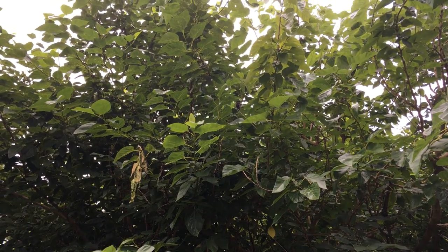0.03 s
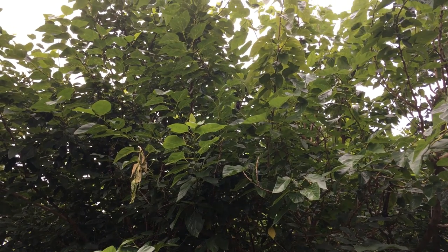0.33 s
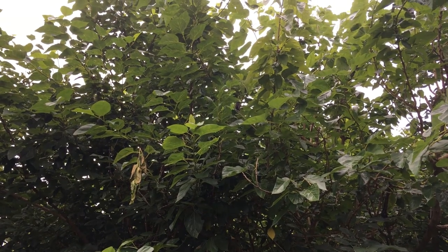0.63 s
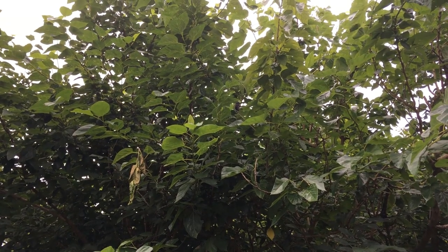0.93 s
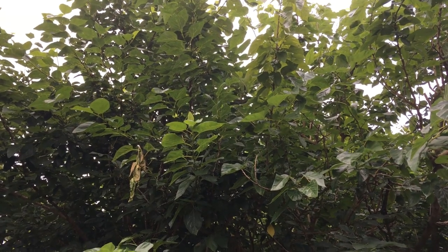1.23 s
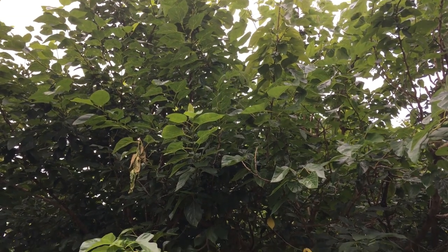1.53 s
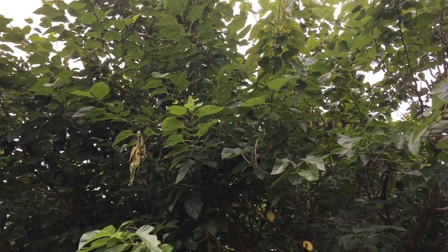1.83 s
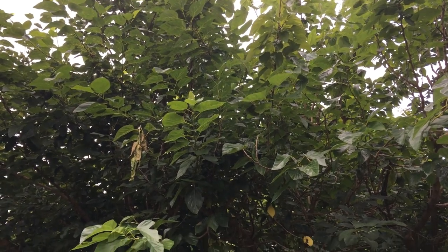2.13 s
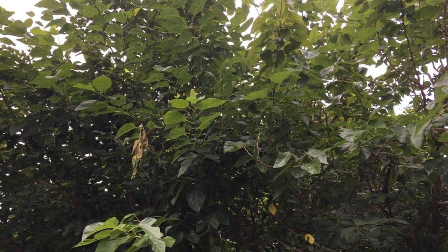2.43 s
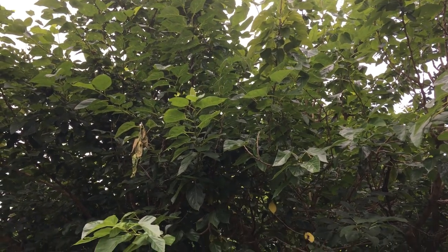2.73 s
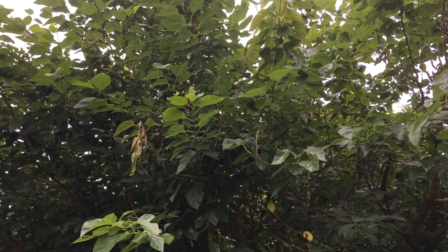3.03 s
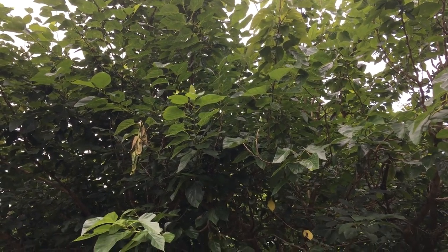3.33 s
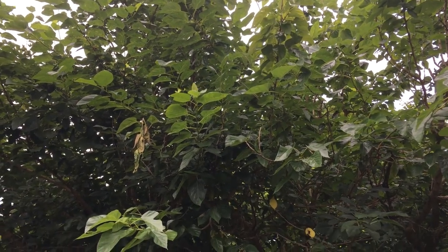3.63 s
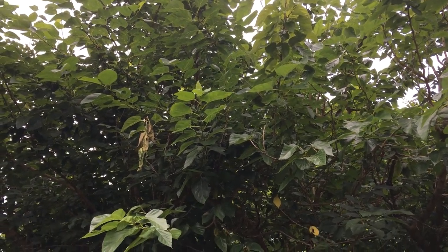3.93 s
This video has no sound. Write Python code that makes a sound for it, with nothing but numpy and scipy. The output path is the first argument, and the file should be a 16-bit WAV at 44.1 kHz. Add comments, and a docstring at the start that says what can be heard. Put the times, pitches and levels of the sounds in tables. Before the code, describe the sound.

A bird chirps steadily among the trees after a few soft knocks, a tick and a brief rumble. Each chirp sweeps up high and ends in a short buzz, ringing slightly against the quiet background.

```python
"""A bird calls eight times at an even pace in a small echoing room. Each call sweeps up into a shrill
whistle, then breaks and drops to a short nasal buzz, coloured by its throat and beak. The direct sound
is dulled, echoes scatter its highs and a thin ring lingers. Three soft knocks, a low rumble and a tick
come before the first call, one more knock later. A faint hush and a few far-off notes lie underneath."""
import sys
import numpy as np
from scipy import signal
from scipy.fft import rfft, irfft
from scipy.io import wavfile
from scipy.ndimage import uniform_filter1d

SR = 44100
rng = np.random.default_rng(int(sys.argv[2]) if len(sys.argv) > 2 else 0)


def master(y):
    """Save y as 16-bit WAV."""
    cut = np.clip(np.atleast_2d(y).T, -1, 1)
    pcm = np.round(cut * 32767)  # scale
    wavfile.write(sys.argv[1], SR, pcm.astype(np.int16))


N = 176400
JITTER = 0.021   # typical pitch wobble as a call starts, as a share of the pitch


def from_db(db):
    """Turn decibels into a number to multiply by."""
    return 10 ** (np.asarray(db) / 20)


def rms_one(x):
    """Scale a signal so that its average strength (rms) is 1."""
    return x / np.sqrt(np.mean(x ** 2) + 1e-20)


def clock():
    """The time of every sample in seconds."""
    return np.arange(N) / SR


def drift(rate_hz):
    """A smooth random wander of typical size 1; a higher rate wanders faster."""
    hz = np.fft.rfftfreq(N, 1 / SR)
    return rms_one(irfft(rfft(rng.standard_normal(N)) / (1 + (hz / rate_hz) ** 2), N))


def noise(colour):
    """Noise of strength 1, its lows and highs set by rows of f/Hz, level/dB."""
    hz, db = np.transpose(colour)
    gain = from_db(np.interp(np.log(np.fft.rfftfreq(N, 1 / SR) + 1), np.log(hz), db))
    return rms_one(irfft(rfft(rng.standard_normal(N)) * gain, N))


def dying(start_s, fade_s):
    """A level that jumps to 1, then falls by 60 dB every fade_s seconds."""
    age = clock() - start_s
    return (age >= 0) * np.exp(-np.log(1000) * np.maximum(age, 0) / fade_s)


def background():
    """A faint, wavering background hush, with one soft swell in the middle pitches."""
    # tone colour of the hush: f/Hz, level/dB
    hush_colour = [(12, -38), (20, 0), (66, 3), (87, -2), (103, -3.5), (140, -9), (238, -9.5), (478, -14),
                   (906, -15), (1160, -17.5), (1410, -17.5), (2090, -24), (15500, -28)]
    # rise and fall of the swell: t/s, level/dB
    swell_levels = [(0, -93), (3.1, -75), (3.3, -67.5), (3.5, -74.5), (4, -88)]
    # tone colour of the swell: f/Hz, level/dB
    swell_colour = [(100, -60), (500, -14), (800, -14.5), (1100, -14.5), (1600, -25), (16000, -61)]
    hush = from_db(-63.5 - 1.35 * drift(rate_hz=12)) * noise(hush_colour)
    swell = from_db(np.interp(clock(), *np.transpose(swell_levels))) * noise(swell_colour)
    return hush + swell


def far_notes():
    """Short, soft, wavering tones from far away."""
    # the peak of each note: t/s, f/Hz, level/dB
    notes = [(3.037, 770, -59), (3.285, 1070, -59), (3.31, 620, -64), (3.352, 910, -60.5)]
    t, half_length_s = clock(), 0.014
    waver = 1 + 0.0486 * drift(rate_hz=127.9)
    phase_per_hz = 2 * np.pi * np.cumsum(waver) / SR
    return sum(from_db(db) * np.exp(-((t - peak_s) / half_length_s) ** 2) * np.sin(hz * phase_per_hz)
               for peak_s, hz, db in notes)


def small_noises():
    """Dull knocks, a dry tick and a low rumble: bursts of noise that start at once and die away."""
    # the knocks: t/s, level/dB
    hits = [(0.096, -61), (0.362, -54), (.772, -47), (3.227, -52)]
    # tone colours of the three sounds: f/Hz, level/dB
    knock_colour = [(60, 2.5), (170, -7), (320, 2), (550, -12), (900, -9), (1700, -20),
                    (3000, -32), (16000, -44)]
    tick_colour = [(100, -24), (1400, -9), (2100, 4), (3200, -9), (5500, -7), (8000, -16), (16000, -13)]
    rumble_colour = [(30, -11), (70, -11), (92, 2.5), (125, -6), (220, -27), (600, -26), (16000, -70.5)]
    knocks = noise(knock_colour) * sum(from_db(db) * dying(s, fade_s=0.064) for s, db in hits)
    tick = from_db(-54) * noise(tick_colour) * dying(start_s=1.233, fade_s=0.089)
    rumble = from_db(-54) * noise(rumble_colour) * dying(start_s=1.155, fade_s=1.15)
    return knocks + tick + rumble


def room(sound):
    """A small room: the direct sound is dulled, echoes scatter its highs and a thin ring lingers."""
    # layers of blurred echoes: time to fade by 60 decibels/s, level/dB
    layers = [(0.052, -7), (0.171, -7.5), (.38, -13)]
    dull_above_hz, scatter_above_hz, ring_hz = 4630, 2380, 3120
    echoes = sum(from_db(db) * rms_one(rng.standard_normal(N) * dying(0, s)) for s, db in layers)
    keep_highs = signal.butter(2, scatter_above_hz, "high", fs=SR, output="sos")
    echoes = signal.sosfilt(keep_highs, echoes / np.sqrt(N))
    ring_fade = dying(0, fade_s=0.47)
    ring = from_db(-5.5) * 2 * ring_fade / ring_fade.sum() * np.sin(2 * np.pi * ring_hz * clock())
    direct = signal.sosfilt(signal.butter(1, dull_above_hz, fs=SR, output="sos"), sound)
    return from_db(-4) * direct + signal.fftconvolve(sound, echoes + ring)[:N]


def call_shape(t, start, snap, end, top_hz, buzz_hz, lateness, settle_s, hoarse_s, whistle_db, buzz_db):
    """How one call moves: it climbs, breaks at the time snap, settles to a buzz and slips down."""
    # the climb: share of its length, share of the top pitch, level/dB
    climb_points = [(0, .13, -40.5), (.11, 0.29, -22.5), (0.188, .48, -13.5), (0.251, .62, -7.5),
                    (.36, .735, -5.5), (0.519, .84, -0.5), (.7, .965, -2.5), (.83, 0.97, 2.5),
                    (0.918, 1, -7), (.96, .84, -4)]
    drop_hz, drop_s, sag_hz = 1297, .007, 459   # a quick drop at the break, then a slower sag
    slip_hz, slip_lead_s, slip_s = 232, 0.0097, 0.0029   # depth, time before the end, half length
    fade_lead_s, fade_db_per_s = 0.0098, 1292
    share, height, level = np.transpose(climb_points)
    share = np.append(share, 1)   # one more point joins the climb to the buzz
    progress = np.clip((t - start) / (snap - start), 0, 1) ** lateness
    after = np.maximum(t - snap, 0)
    fall = buzz_hz + drop_hz * np.exp(-after / drop_s) + sag_hz * np.exp(-after / settle_s)
    fall -= slip_hz * (1 + np.tanh((t - end + slip_lead_s) / slip_s)) / 2
    climb = np.interp(progress, share, np.append(height * top_hz, fall[0]))
    hz = uniform_filter1d(np.where(t < snap, climb, fall), size=120)
    db = np.interp(progress, share, np.append(level + whistle_db, buzz_db))
    db -= fade_db_per_s * np.maximum(t - end + fade_lead_s, 0)
    accent_db = 15.5 * np.exp(-((t - end + slip_s) / 0.0089) ** 2)   # a brief push on the slip
    # The voice clears as it climbs, turns hoarse at the break, then clears again.
    climb_jitter = JITTER * (1 - 0.76 * progress ** 2)
    buzz_jitter = 0.0022 + 0.021 * np.exp(-after / hoarse_s)
    return hz, db, accent_db, np.where(t < snap, climb_jitter, buzz_jitter)


def voice(hz, db, accent_db, wobble):
    """A stack of tones (harmonics), rich when low and nearly pure when high; hz is the second one."""
    # harmonics 1, 2, ... of the whistle: level/dB
    whistle_levels = [-37.5, 0.5, -25, -15.5, -29, -72]
    # harmonics 1, 2, ... of the buzz: level/dB
    buzz_levels = [-38, 2, 1.5, -1.5, -2, -12, -3.5, -18, -3, -9.5, -29, -10, -23, -34, -58, -30]
    # pitches that the throat and beak strengthen: f/Hz, width/Hz, lift/dB
    throat = [(3148, 60, 5.5), (3740, 300, 5.5), (5740, 1460, 0.5), (7980, 660, 3.5), (9530, 490, 1.5),
              (12700, 750, 2.5), (14810, 2360, 11)]
    buzz_below_hz, whistle_above_hz = 2060, 5080
    purity = np.clip((hz - buzz_below_hz) / (whistle_above_hz - buzz_below_hz), 0, 1)
    phase = 2 * np.pi * np.cumsum(hz / 2 * (1 + wobble)) / SR
    whistle_gains = np.pad(from_db(whistle_levels), (0, len(buzz_levels) - len(whistle_levels)))
    out = 0
    for k, (whistle, buzz) in enumerate(zip(whistle_gains, from_db(buzz_levels)), 1):
        tone_hz = k * hz / 2
        lift_db = sum(lift / (1 + (2 * (tone_hz - centre) / width) ** 2)
                      for centre, width, lift in throat)
        lift_db += accent_db * (k == 4)   # only the fourth harmonic gets the accent
        gain = (purity * whistle + (1 - purity) * buzz) * from_db(db + lift_db)
        gain *= np.clip((SR / 2 - tone_hz) / (SR / 10), 0, 1)   # fade tones too high for the sample rate
        out = out + np.sqrt(2) * gain * np.sin(k * phase + rng.uniform(0, 2 * np.pi))
    return out


def bird():
    """Eight calls; the hoarser the voice, the more its pitch and level tremble."""
    # the calls: start/s, break/s, end/s, top pitch/Hz, buzz pitch/Hz, lateness (above 1 climbs later),
    # settling time/s, hoarse time/s, whistle level/dB, buzz level/dB
    calls = [(1.463, 1.609, 1.665, 6520, 1947, 0.95, 0.068, 0.023, -32, -45),
             (1.785, 1.932, 2.013, 7356, 1970, 0.99, 0.043, 0.021, -30, -47.5),
             (2.146, 2.282, 2.374, 7703, 2030, 1.036, 0.03, 0.013, -29.5, -46),
             (2.496, 2.645, 2.723, 7800, 1990, 1.063, 0.039, 0.025, -29, -46),
             (2.842, 2.981, 3.075, 7830, 2080, .95, 0.015, 0.011, -31, -48.5),
             (3.193, 3.336, 3.427, 7935, 2020, .93, .03, 0.017, -32, -47.5),
             (3.539, 3.69, 3.787, 7925, 1990, 0.98, 0.044, 0.021, -31.5, -46.5),
             (3.899, 4.057, 4.140, 7964, 2000, 1.02, .035, .018, -30.5, -61)]
    t, out, tail_s = clock(), np.zeros(N), .03
    wobble = drift(rate_hz=380)
    shimmer = 4.5 * drift(rate_hz=380)
    for call in calls:
        start, _, end = call[:3]
        on = (t >= start) & (t < end + tail_s)
        hz, db, accent_db, jitter = call_shape(t[on], *call)
        out[on] += voice(hz, db + shimmer[on] * jitter / JITTER, accent_db, wobble[on] * jitter)
    return out


def scene():
    """The bird in the room, over the quiet background, in one channel."""
    return (room(bird()) + small_noises() + background() + far_notes())[None]


def record(dry):
    """Cut off the very highest sounds steeply."""
    cutoff_hz = 15850
    return signal.sosfilt(signal.ellip(12, .1, 80, cutoff_hz, fs=SR, output="sos"), dry)


dry = scene()
out = record(dry)
master(out)
```